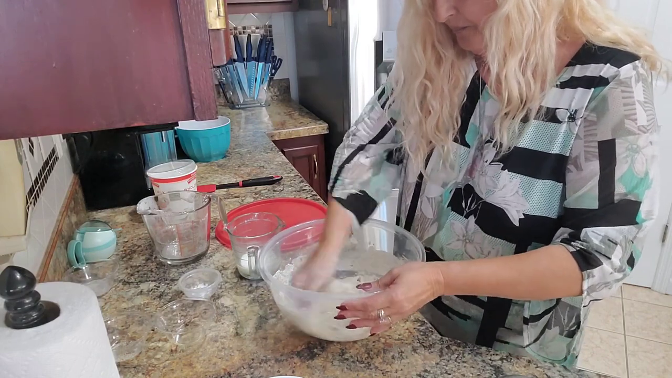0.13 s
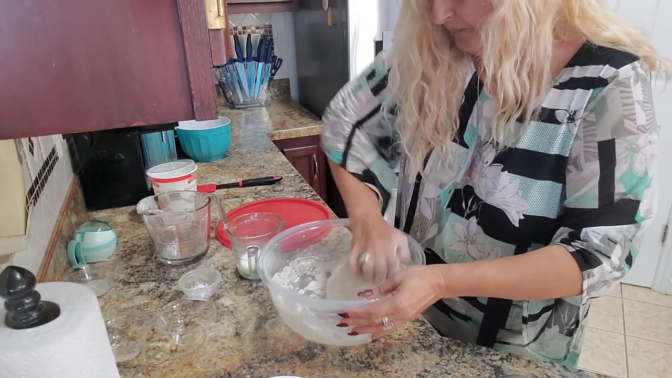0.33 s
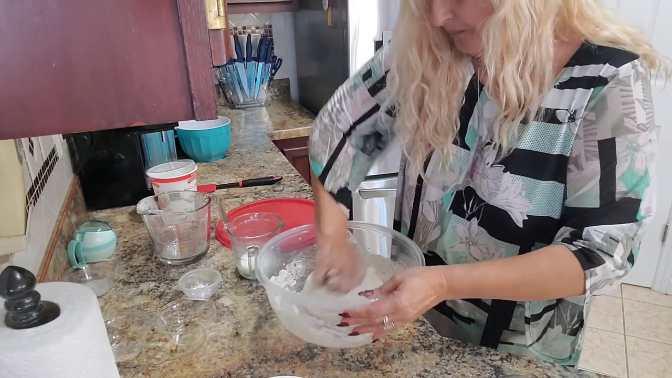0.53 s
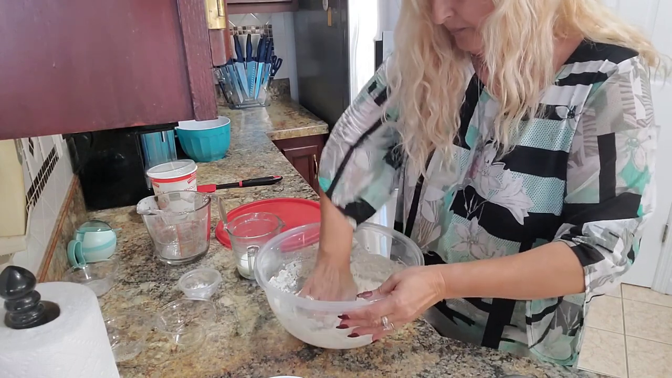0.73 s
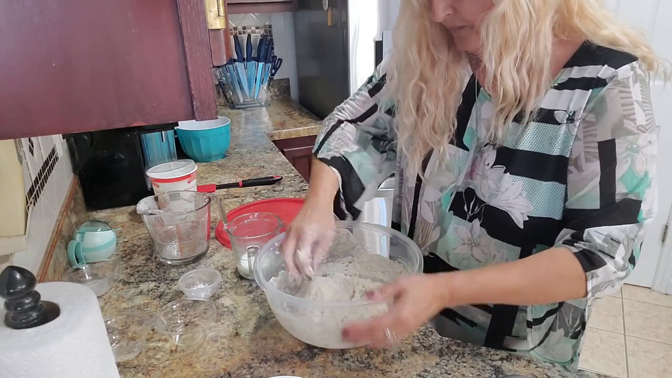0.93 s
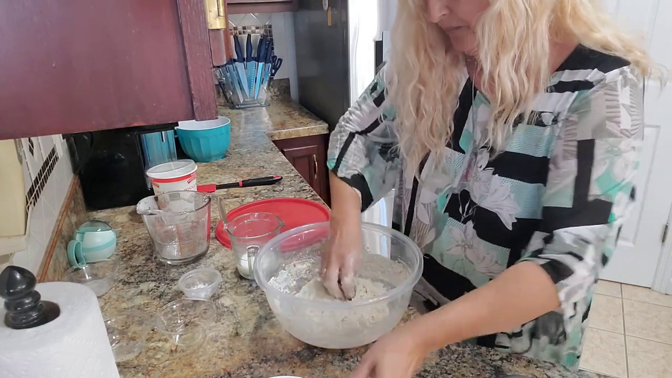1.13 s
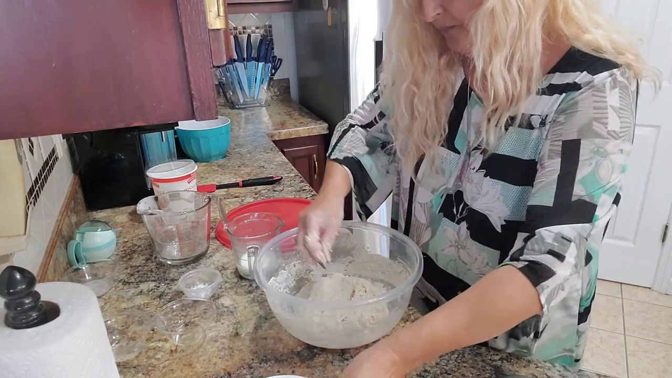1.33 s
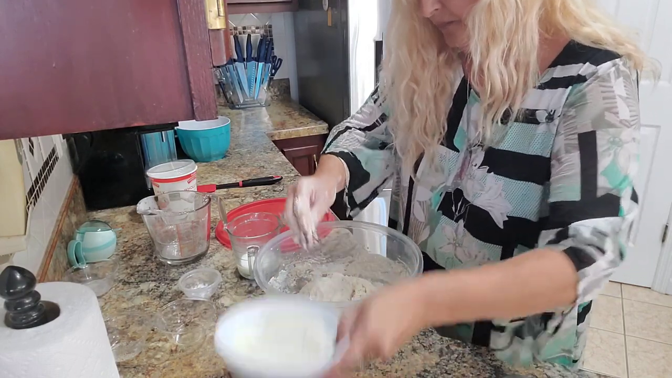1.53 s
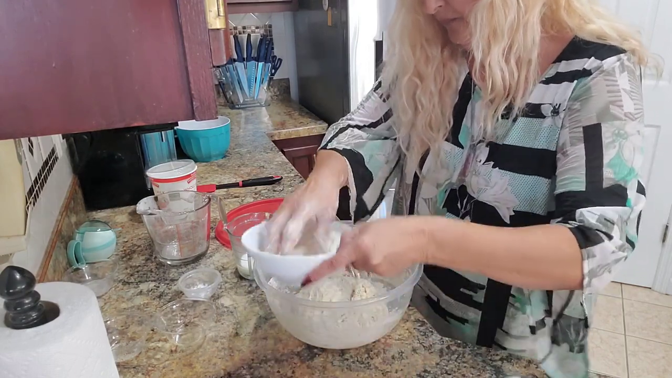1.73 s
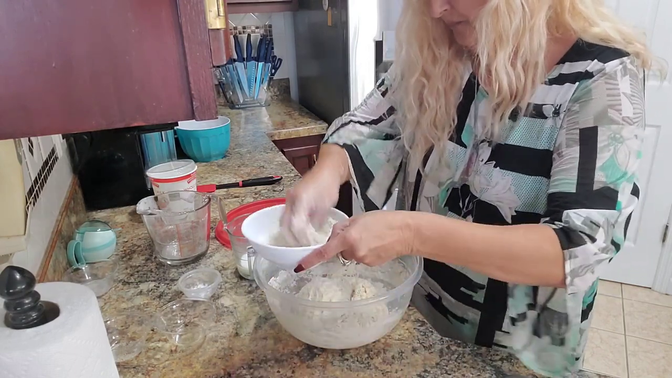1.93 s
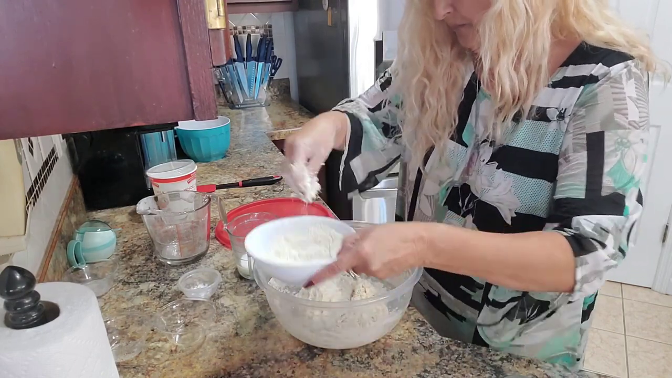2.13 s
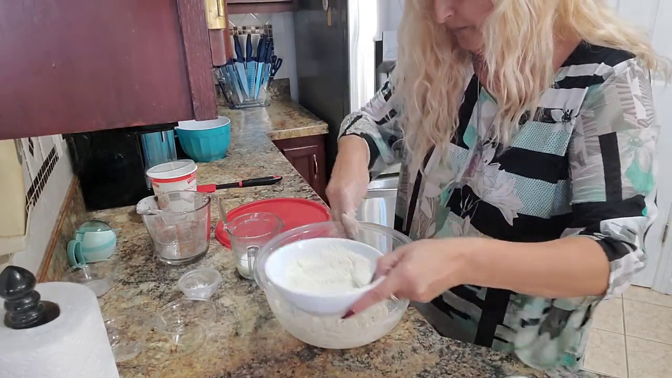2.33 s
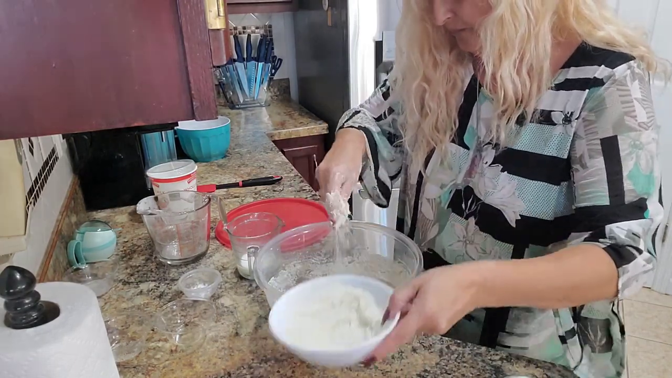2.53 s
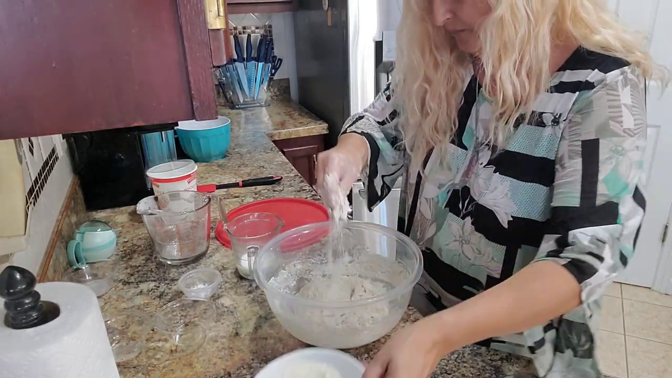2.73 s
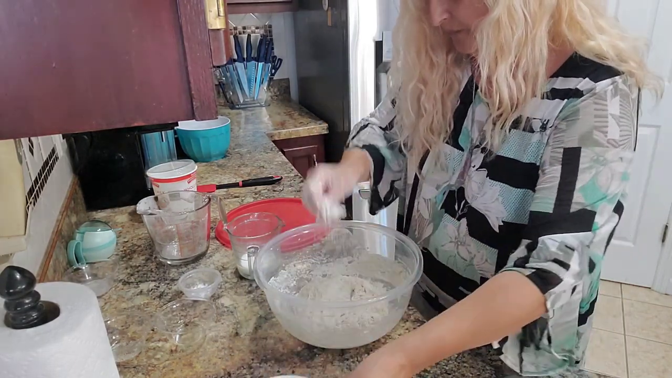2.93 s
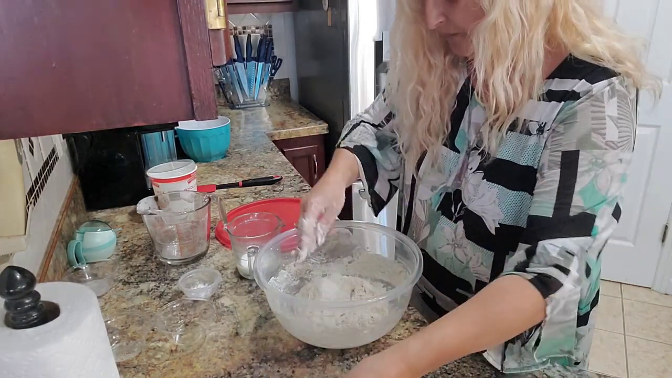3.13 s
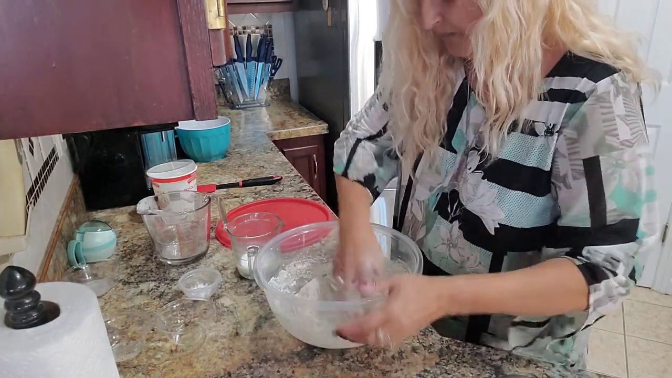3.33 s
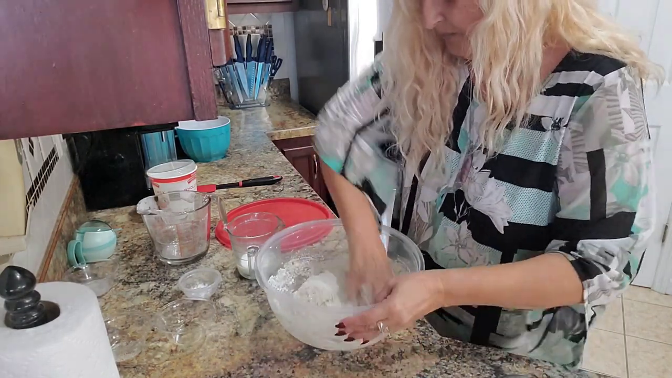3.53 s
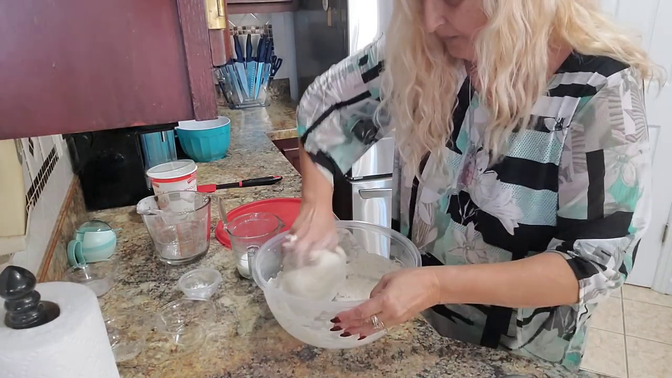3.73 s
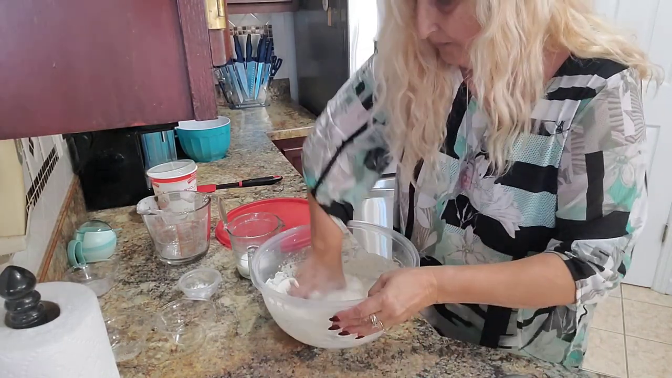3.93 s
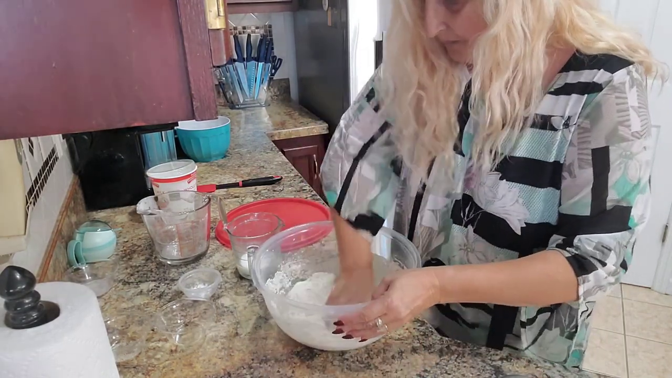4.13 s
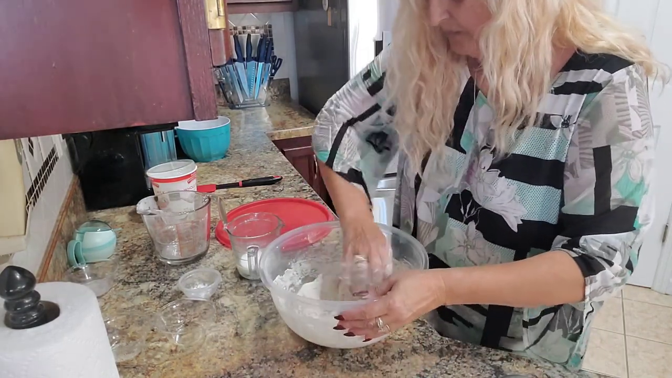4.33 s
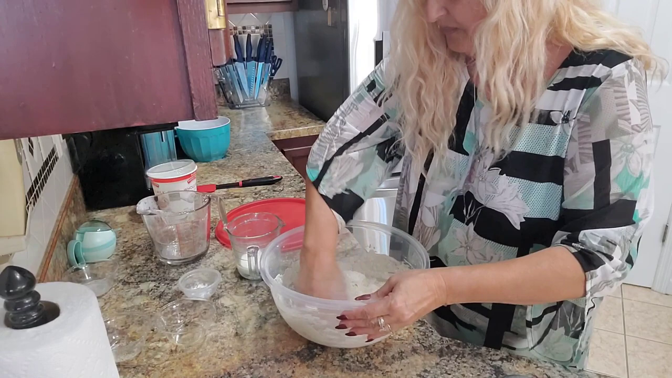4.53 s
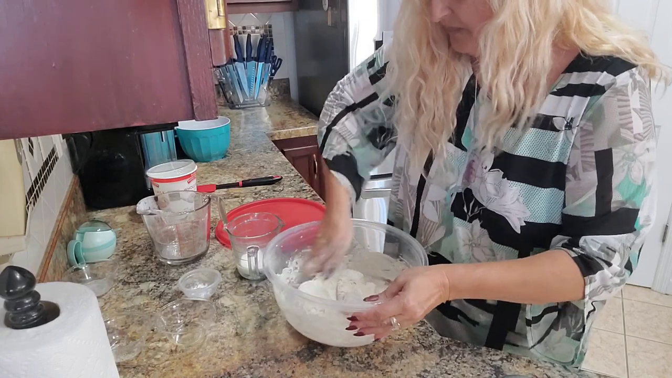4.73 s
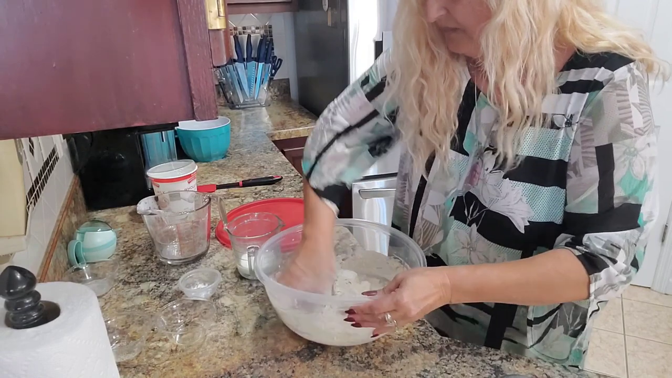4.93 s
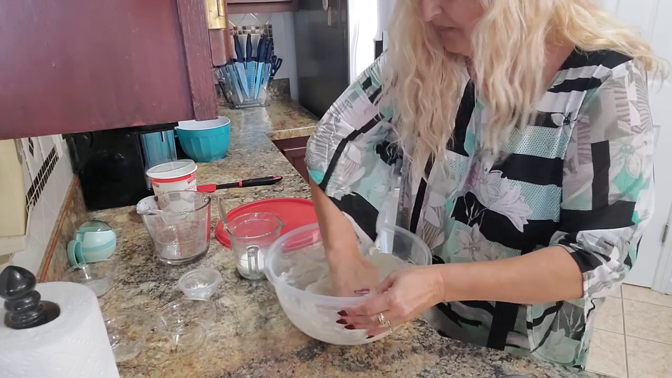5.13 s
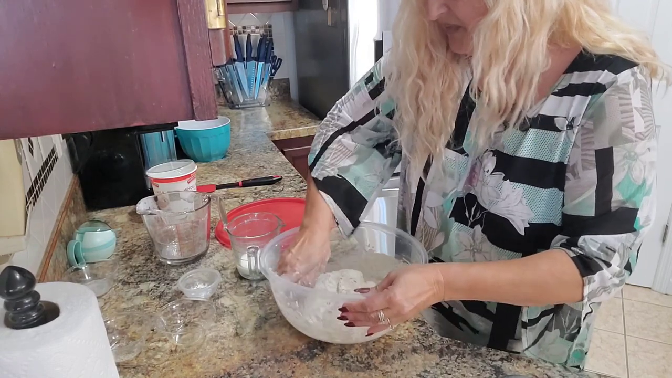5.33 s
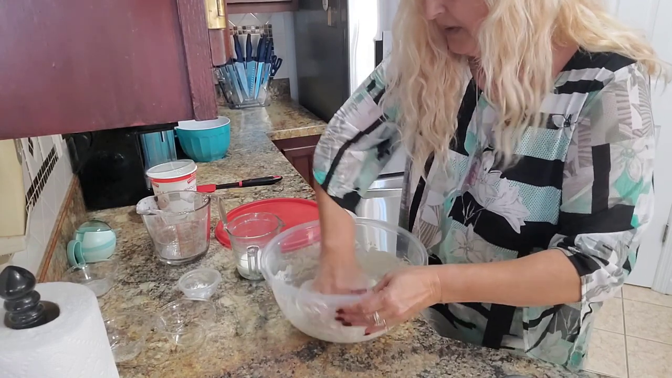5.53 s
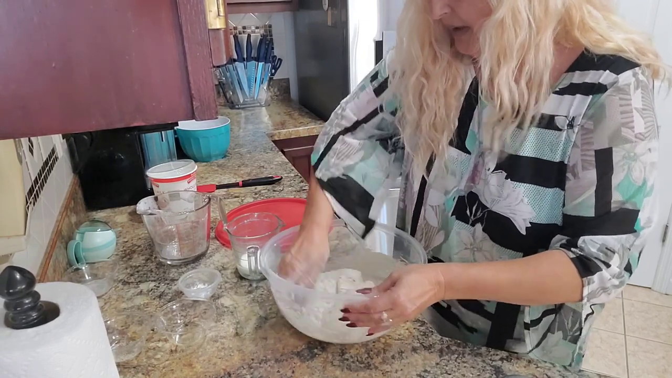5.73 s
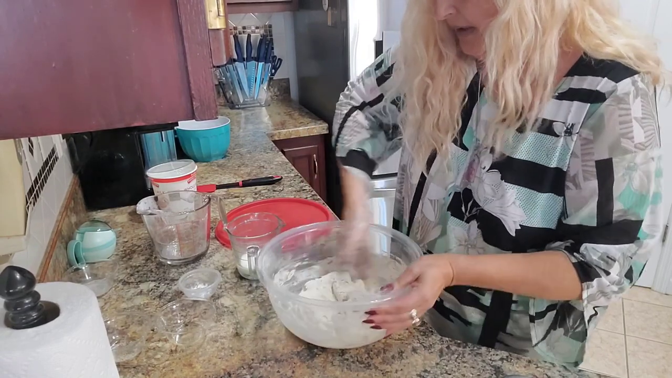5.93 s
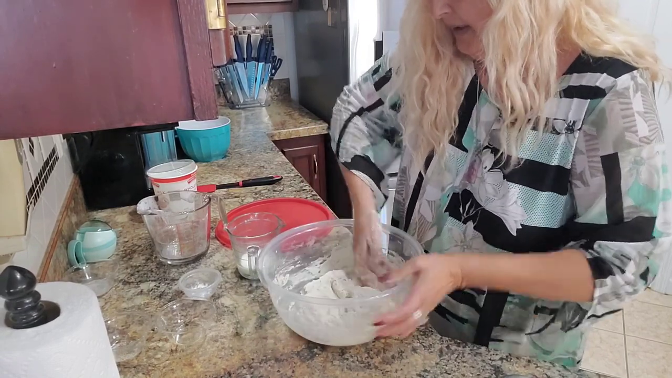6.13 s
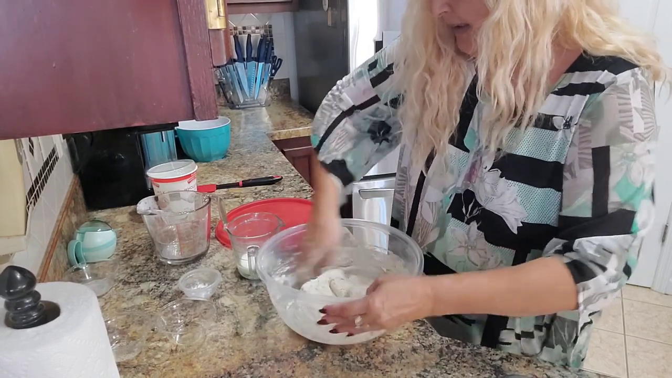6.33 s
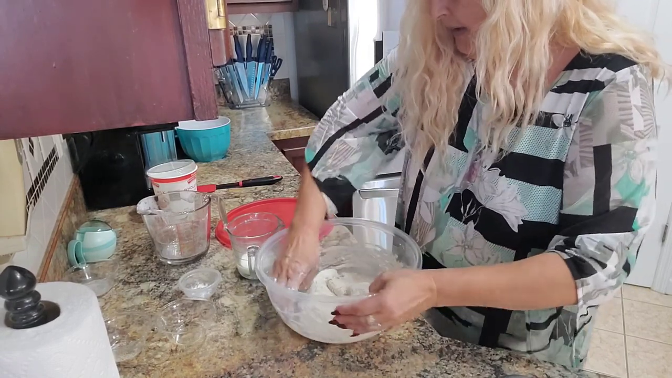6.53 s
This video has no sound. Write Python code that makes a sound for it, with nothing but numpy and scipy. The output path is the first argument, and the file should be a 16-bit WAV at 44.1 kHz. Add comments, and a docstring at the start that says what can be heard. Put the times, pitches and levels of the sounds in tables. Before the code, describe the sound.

Short rough scrapes and soft hollow bumps come from dough being mixed by hand in a plastic bowl, heard close with a short kitchen reverberation. A quiet middle holds faint taps and a dish's hollow clunk, then hard cracks as it lands on stone. A few strokes follow before vigorous scraping, booming knocks and floury hiss fill the last two seconds over quiet room noise.

```python
"""A hand scrapes and folds floury dough in a plastic bowl on a stone kitchen counter.
Room air, faint tones and a fading drone (noise, sines) run from the start, with the bowl's low presses.
Slips along the wall boom, scratch and hiss as filtered noise; fingers knock it into resonance.
From 1.5 s a small dish is lifted and set down, with a crack and a hollow ring; scraping thins out,
then grows dense after 4.5 s. Bowl and dish ring briefly in the kitchen through decaying taps."""
import sys
import numpy as np
from scipy import signal
from scipy.fft import rfft, irfft
from scipy.io import wavfile
from scipy.ndimage import uniform_filter1d

SR = 44100
rng = np.random.default_rng(int(sys.argv[2]) if len(sys.argv) > 2 else 0)


def materialize(psi):
    """Save the field psi as 16-bit PCM at rate SR to the path in sys.argv[1].

    A 1-D psi becomes a single channel; in a 2-D psi each row is a channel.
    """
    bounded = np.clip(np.atleast_2d(psi).T, -1, 1)
    quanta = np.round(bounded * 32767).astype(np.int16)
    wavfile.write(sys.argv[1], SR, quanta)


N = 289737

# Low resonances of the bowl wall: mode_hz, width_hz, level_db
BOWL_LOW_MODES = [(330.5, 141, -9), (435, 61, -4.5), (583, 81, -1.5), (818, 248, -6.5), (943, 73, -1.5)]


def gain_of(db):
    """Logarithmic level: decibels to amplitude."""
    return 10 ** (np.asarray(db) / 20)


def evened(x):
    """Normalisation: a signal scaled to unit rms."""
    return x / np.sqrt(np.mean(x ** 2) + 1e-20)


def read_curve(points, hz):
    """Interpolation of a table on a logarithmic frequency axis."""
    point_hz, value = np.transpose(points)
    return np.interp(np.log(hz + 1), np.log(point_hz + 1), value)


def coloured(x, points):
    """Linear filtering: a spectral envelope imposed on a signal, then unit rms."""
    envelope_db = read_curve(points, np.fft.rfftfreq(N, 1 / SR))
    return evened(irfft(rfft(x) * gain_of(envelope_db), N))


def resonate(x, hz, width_hz):
    """Damped oscillator: a complex one-pole resonance of about unit peak gain."""
    radius = np.exp(-np.pi * width_hz / SR)
    pole = radius * np.exp(2j * np.pi * hz / SR)
    return 2 * signal.lfilter([1 - radius], [1, -pole], x + 0j).real


def ring_modes(x, modes):
    """Modal superposition: a body answers as a sum of resonances of alternating sign."""
    out = 0
    for k, (hz, width_hz, db) in enumerate(modes):
        out = out + (-1) ** k * gain_of(db) * resonate(x, hz, width_hz)
    return out


def gesture_gain(rows, column, rise, sag, fall):
    """Exponential envelopes: gestures swell, sag while held and die away (dB/s); powers add."""
    t = np.arange(0, N + 64, 64) / SR
    power = 0
    for row in rows:
        since, hold = t - row[0], max(row[1], 0)
        db = row[column] + rise * np.minimum(since, 0)
        db = db - sag * np.clip(since, 0, hold) - fall * np.maximum(since - hold, 0)
        power += gain_of(db) ** 2
    return np.interp(np.arange(N) / SR, t, np.sqrt(power))


def add(mix, start_s, sound):
    """Linear superposition: a sound joins the mix at start_s."""
    part = mix[round(start_s * SR):][:len(sound)]
    part += sound[:len(part)]


def room_air():
    """Stationary noise: broad room air, a narrow noise band as a fuzzy hum, and a thin steady tone."""
    # Room noise envelope: freq_hz, relative_db_per_hz
    air_points = [(15, -67), (25, -15), (76, -7.5), (137, -13), (175, -9), (344, -8), (416, -10),
                  (886, -14), (961, -12.5), (1260, -19), (1480, -17.5), (1740, -22.5), (14700, -31.5),
                  (16000, -31)]
    # Fuzzy hum: centre_hz, width_hz, level_db
    hum_band = (119.5, 9.5, -59.5)
    # Thin tone: tone_hz, level_db
    thin_tone = (14400, -75)
    air = gain_of(-48) * coloured(rng.standard_normal(N), air_points)
    hum_hz, width_hz, hum_db = hum_band
    hum = gain_of(hum_db) * evened(resonate(rng.standard_normal(N), hum_hz, width_hz))
    tone_hz, tone_db = thin_tone
    whine = gain_of(tone_db) * np.sqrt(2) * np.sin(2 * np.pi * tone_hz * np.arange(N) / SR)
    return air + hum + whine


def drone():
    """Frequency and amplitude modulation: a low sine wanders in pitch, wavers and dies away."""
    # Level of the drone before its waver: time_s, level_db
    fade_points = [(0, -50), (2, -51), (2.4, -59), (3, -54), (3.5, -58), (4.2, -73), (6.57, -114)]
    pitch_hz, wander_hz, waver_db = 74.8, 1.3, 2.2  # wander and waver are rms
    hz = pitch_hz + wander_hz * evened(uniform_filter1d(rng.standard_normal(N), size=20000))
    waver = gain_of(waver_db * evened(uniform_filter1d(rng.standard_normal(N), size=5000)))
    fade = gain_of(np.interp(np.arange(N) / SR, *np.transpose(fade_points)))
    return np.sqrt(2) * np.sin(2 * np.pi * np.cumsum(hz) / SR) * waver * fade


def pressing():
    """Structure-borne sound: the bowl rocks and presses, sending low noise through the counter."""
    # Presses on the counter: start_s, hold_s, level_db
    presses = [(0, 0.046, -42.5), (.12, 0.16, -41.5), (.53, 0.035, -39), (.67, .04, -44), (.8, 0.33, -48.5),
               (3.5, 0.066, -48.5), (4.56, 0.025, -64), (4.71, 0.046, -51), (4.8, 0.033, -42),
               (5.0, 0.27, -47), (5.32, 0.079, -40), (5.51, 0.036, -42), (5.69, 0.072, -36),
               (5.87, 0.063, -52), (5.98, 0.15, -47), (6.42, 0.051, -40)]
    # Envelope of the low noise: freq_hz, relative_db_per_hz
    low_points = [(20, -30), (50, -4), (70, -0.5), (120, -3.5), (200, -10.0), (270, -7.0),
                  (380, -17), (600, -58)]
    noise = coloured(rng.standard_normal(N), low_points)
    return noise * gesture_gain(presses, column=2, rise=350, sag=11, fall=114)


def slips(per_s, spread_db, smooth):
    """Stick-slip friction: random slips of uneven size over a share of smooth rubbing."""
    slipping = rng.random(N) < per_s / SR
    size = gain_of(spread_db * np.minimum(rng.exponential(1, N), 5)) * slipping
    return evened(size * rng.standard_normal(N)) + smooth * rng.standard_normal(N)


def patchy(x, patch_db, flicker_db):
    """Time-varying filtering: colour drifts as the contact moves, level flickers as the grip catches."""
    z = signal.stft(x, nperseg=256, noverlap=192)[2]
    patches = rng.standard_normal(z.shape[::-1]).T  # frequency by time
    flicker = evened(uniform_filter1d(patches[0], size=14))
    patches = uniform_filter1d(patches, size=3, axis=0)
    patches = evened(uniform_filter1d(patches, size=24, axis=1))
    gain = gain_of(patch_db * patches + flicker_db * flicker)
    return evened(signal.istft(z * gain, nperseg=256, noverlap=192)[1][:N])


def rubbing():
    """Friction excitation: coarse slips boom in the wall, crumbs and nails scratch it, flour hisses."""
    # Strokes of the hand along the wall: start_s, hold_s, scrape_db, boom_db, hiss_db, nail_db
    strokes = [(.05, 0.1, -46.5, -43, -58, -64), (.135, 0.09, -39.5, -38, -52.5, -42.5),
               (.243, 0.063, -29.5, -33.5, -43, -35.5), (.35, 0.043, -41, -42, -48.5, -45.5),
               (.405, 0.14, -36.5, -39, -51, -45.5), (.6, .03, -45, -41, -54, -49.5),
               (.665, 0.037, -40, -35, -53, -45), (.785, 0.028, -49.5, -42.5, -54, -50.5),
               (.95, 0.046, -48.5, -41.5, -55, -58), (1.03, 0.03, -40, -40.5, -50.5, -48.5),
               (1.24, 0.23, -66, -53, -56, -64), (1.93, 0.063, -64, -50, -58, -72),
               (2.49, 0.11, -57, -46.5, -63, -74), (2.66, 0.084, -56, -54, -60, -73),
               (2.86, 0.057, -64, -55, -57, -64), (3.497, 0.066, -63, -42.5, -53.5, -72),
               (3.575, 0.042, -37.5, -34, -49.5, -44), (3.66, 0.037, -49.5, -41, -68, -53),
               (3.83, 0.036, -46.5, -57, -74, -60), (3.88, 0.029, -42, -45, -74, -51.5),
               (4.065, 0.051, -43, -42.5, -58, -46), (4.15, 0.11, -43, -42, -61, -51.5),
               (4.31, 0.1, -40, -44, -55, -49), (4.45, 0.041, -50.5, -50, -55, -71),
               (4.57, 0.018, -38, -34.5, -46.5, -41.5), (4.635, 0.13, -28, -26.5, -39, -29.5),
               (4.79, 0.071, -30, -33.5, -43.5, -34), (4.945, 0.022, -37, -41, -49, -51),
               (4.985, 0.076, -33, -32.5, -43, -34), (5.07, .15, -29, -27.5, -38, -32.5),
               (5.29, 0.018, -35, -34, -50, -50), (5.33, .1, -30.5, -26, -37, -35),
               (5.45, 0.021, -37, -32.5, -46, -39), (5.515, 0.005, -33.5, -38, -42.5, -43),
               (5.57, .02, -37, -41, -56, -51), (5.61, 0.049, -28, -24.5, -35, -31),
               (5.72, 0.042, -32, -34, -54, -44), (5.755, .02, -35, -33, -47, -39),
               (5.78, 0.017, -31.5, -29, -36.5, -33.5), (5.85, .14, -30.5, -26.5, -43, -36),
               (6.03, 0.074, -34, -32.5, -49.5, -41), (6.1, 0.027, -31.5, -33, -46.5, -39),
               (6.18, 0.093, -43, -42.5, -62, -60), (6.33, 0.12, -40, -40, -58, -54),
               (6.42, 0.071, -33, -32, -48, -40.5), (6.52, 0.046, -32, -37.5, -45, -36.5)]
    # Envelope of the crumbs' scrape: freq_hz, relative_db_per_hz
    scrape_points = [(650, -71), (1100, -2), (1250, 0.5), (1380, 1.5), (1770, 0.5), (2220, 3.5),
                     (2800, -11.5), (3640, -31.5), (6160, -120)]
    # Envelope of the flour's hiss: freq_hz, relative_db_per_hz
    flour_points = [(3120, -8), (5300, -5.5), (5520, -7), (5890, -12), (6380, -8.5), (7810, -8), (8490, -6),
                    (10200, -1.5), (11500, -11.5), (12500, -4.5), (13100, -5.5), (15300, -10), (16000, -49)]
    # Envelope of the nails' edge: freq_hz, relative_db_per_hz
    nail_points = [(1650, -6.5), (2800, 3.5), (3510, 4.5), (3780, 1.5), (4780, 4), (5070, 3.5), (5500, -22),
                   (7150, -27), (12100, -120)]
    boom = evened(ring_modes(slips(300, spread_db=2.5, smooth=.9), BOWL_LOW_MODES))
    crumbs = patchy(slips(1500, spread_db=2.0, smooth=1.1), patch_db=2.7, flicker_db=1.2)
    grains = patchy(slips(4400, spread_db=1.6, smooth=1.2), patch_db=1.8, flicker_db=1.6)
    scrape, nails = coloured(crumbs, scrape_points), coloured(crumbs, nail_points)
    hiss = coloured(grains, flour_points)
    out = np.zeros(N)
    for column, layer in enumerate((scrape, boom, hiss, nails), start=2):
        out += layer * gesture_gain(strokes, column, rise=476, sag=5, fall=350)
    return out


def kitchen(x):
    """Reverberation: sparse taps of random sign, each band dying at its own speed."""
    # Decay time for 60 dB: freq_hz, t60_s
    decay_points = [(100, 0.33), (400, 0.33), (1000, 0.45), (2500, 0.43), (6000, 0.31), (14000, 0.46)]
    taps = np.zeros(SR)
    at = np.arange(300, SR - 20, 20)  # one tap in every 20 samples
    taps[at + rng.integers(0, 20, len(at))] = rng.choice([-1., 1.], len(at))
    hz, t, z = signal.stft(taps, SR, nperseg=256)
    decay = gain_of(-60 * t / read_curve(decay_points, hz)[:, None])
    tail = signal.istft(z * decay, SR, nperseg=256)[1]
    return signal.fftconvolve(x, tail / np.linalg.norm(tail))[:N]


def blow(db, hard_db, contact_ms, thud_hz):
    """Impact excitation: a short ragged contact rings wall modes and the thud of the struck spot."""
    # High resonances of the bowl wall: mode_hz, width_hz, level_db
    high_modes = [(1371, 140, 14), (1818, 52, 16.5), (2210, 750, 10.5), (3070, 260, 6.5), (3770, 300, -20),
                  (4960, 820, 6.5)]
    rise_ms, push_ms, push_db = 1.522, .19, 5.5
    thud_width_hz, thud_db = 116, 9.5
    overtone = 3.65  # the struck spot also rings this many times above its thud
    ms = np.arange(4000) / SR * 1000
    touch = np.exp(-ms / max(contact_ms, .2)) * (1 - np.exp(-ms / rise_ms))
    touch *= rng.standard_normal(len(ms))
    touch += gain_of(push_db) * np.exp(-((ms - rise_ms) / push_ms) ** 2)
    touch = signal.lfilter(*signal.butter(2, [140, 3300.], "band", fs=SR), touch)  # skin is soft
    low = ring_modes(touch, BOWL_LOW_MODES)
    low += gain_of(thud_db) * resonate(touch, thud_hz, thud_width_hz)
    high = ring_modes(touch, high_modes)
    high += gain_of(10.0) * resonate(touch, overtone * thud_hz, 130)
    return gain_of(db) * (low / abs(low).max() + gain_of(hard_db) * high / abs(high).max())


def knocks():
    """Impulsive excitation: fingers, nails and lumps strike the bowl one after another."""
    # Blows: start_s, body_level_db, treble_over_body_db, contact_ms, thud_pitch_hz
    blows = [(.124, -11.5, -28, 18, 537), (.133, -10, -8, 2.5, 530), (.31, -21.5, 3, 2.9, 814),
             (.322, -23.5, -2, 8.9, 497), (.335, -17, -6, 5, 810), (.348, -19, -22, 3.1, 960),
             (.363, -23, -18, 4.5, 910), (.381, -16, -17, 5.2, 830), (.548, -15, -32, 15, 880),
             (.609, -24, -24, 6.2, 522), (.663, -31, -9, 7.5, 343), (.688, -27.5, 2.5, 6.7, 348),
             (1.055, -29, 10, 4.1, 455), (1.064, -32, 6.5, 3.5, 464), (1.259, -32.5, -6, 4.5, 467),
             (1.972, -29.5, -10.5, 13, 915), (2.513, -34, -11, 5, 468), (2.546, -36, 4, 13, 570),
             (2.711, -41, 8.5, 3.8, 659), (2.878, -34, -0.5, 4.5, 630), (3.493, -25, 0, 24, 560),
             (3.504, -23.5, 5, 5.4, 810), (3.658, -26, -25, 6.5, 673), (3.77, -33.5, 0, 4.1, 645),
             (3.919, -38, 10, 3.5, 513), (4.555, -26.5, -14, 3.7, 509), (4.569, -18, 0.5, 5.7, 680),
             (4.704, -15, -20, 12, 620), (4.733, -13.5, -12, 6.6, 305), (4.74, -6.5, 0, 12, 653),
             (5.017, -14, -20, 6, 624), (5.03, -16.5, -20, 5.9, 636), (5.041, -15.5, -18, 5, 634),
             (5.052, -13, -22, 9.7, 570), (5.517, -21, -10, 6.8, 342), (5.584, -20, 1, 4.6, 790),
             (5.589, -11, 3.5, 5.6, 847), (5.644, -6.5, -1.5, 8.2, 840), (5.73, -18.5, -13, 6.4, 651),
             (5.854, -9.5, 5, 2, 667), (5.882, -20.5, 10.5, 8.1, 640), (5.952, -21, 0.5, 8.2, 623),
             (5.977, -11, -3, 10, 578), (6.3, -36, 4, 4.3, 600), (6.422, -27, 3, 4, 486),
             (6.429, -12, -13, 4.1, 325), (6.441, -25, 5, 1.5, 600), (6.45, -17, -3, 4.2, 920),
             (6.479, -20, -15, 6.3, 500), (6.52, -22, -10, 4.3, 643), (6.538, -27, 8, 7.8, 560),
             (6.547, -27.5, 9, 2.3, 900)]
    out = np.zeros(N)
    for start_s, *row in blows:
        add(out, start_s, blow(*row))
    return out


def dish():
    """Coupled resonators: a hard crack, the dish body, and the hollow counter ringing under it."""
    # Knocks on the counter: start_s, body_level_db, crack_over_body_db, ring_over_body_db, push_ms
    contacts = [(1.467, -6.5, -18, -12.5, 0.33), (3.09, -4, -10.5, -15.5, 0.21),
                (3.109, -11, -22, -1, 0.24), (3.182, -5, -19, -35, 0.14)]
    # Resonances of the dish body: mode_hz, width_hz, level_db
    body_modes = [(222, 61, -6), (299, 51, -2.5), (508, 158, 2.5), (575, 140, 2.5), (680, 37, 1),
                  (862, 330, -6.5), (1088, 244, -6.5), (1400, 67, -18.5)]
    # Resonances of the counter: mode_hz, level_db, t60_s
    counter_modes = [(122, 0.5, 0.095), (317.6, 3, 0.16)]
    # Envelope of the hard rim on stone: freq_hz, relative_db_per_hz
    crack_points = [(1000, -6), (1600, 5.5), (2300, 4), (2900, -9.5), (4000, -1), (5000, -9), (5700, -23),
                    (9000, -20.5), (15000, -32)]
    out, rim, t = np.zeros(N), np.zeros(N), np.arange(SR // 2) / SR
    ring = np.zeros(len(t))
    for hz, db, t60 in counter_modes:
        ring += gain_of(db - 60 * t / t60) * np.sin(2 * np.pi * hz * t)
    ring *= 1 - np.exp(-t / 0.0055)  # the panel takes time to start
    chatter = np.exp(-t / 0.0039) + 0.13 * np.exp(-t / 0.0069)  # the rim rattles as it settles
    chatter *= 1 - np.exp(-t / 0.00026)
    for start_s, db, hard_db, ring_db, push_ms in contacts:
        push = np.exp(-((t * 1000 - .6) / push_ms) ** 2)  # a rounded push
        body = ring_modes(np.gradient(push), body_modes)
        add(out, start_s, gain_of(db) * (body / abs(body).max() + gain_of(ring_db) * ring))
        add(rim, start_s, gain_of(db + hard_db) * chatter)
    return out + rim * coloured(rng.standard_normal(N), crack_points)


def scene():
    """Direct and reverberant fields: bowl close by, dish a little farther, both in the kitchen."""
    bowl, far = rubbing() + knocks(), dish()
    reverb = kitchen(gain_of(-13.5) * bowl + gain_of(-4.0) * far)
    return (bowl + far + reverb + pressing() + room_air() + drone())[None]


def record(dry):
    """Dynamic compression: gain eases down after loud sounds and recovers slowly; then band limits."""
    threshold_db, slope, recovery_db_per_s, edge_hz = -28, 0.12, 36.0, 15900
    power_db = 10 * np.log10(abs(uniform_filter1d(dry[0] ** 2, size=800)) + 1e-12)
    fall_db = np.arange(N) * recovery_db_per_s / SR
    held_db = np.maximum.accumulate(power_db + fall_db) - fall_db
    over_db = np.maximum(held_db - threshold_db, 0)
    # the offset window looks almost wholly at the past
    ducked = dry / gain_of(slope * uniform_filter1d(over_db, size=2000, origin=900))
    ducked = signal.lfilter(*signal.butter(2, 40, "high", fs=SR), ducked)
    lowpass = signal.firwin(511, edge_hz, window=("kaiser", 9), fs=SR)
    return signal.oaconvolve(ducked, lowpass[None], "same")


dry = scene()
out = record(dry)
materialize(out)
```